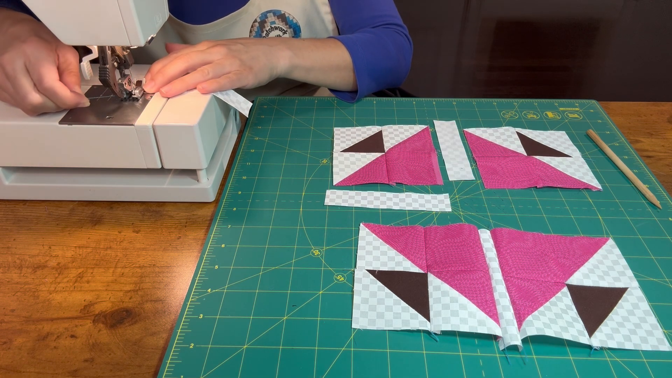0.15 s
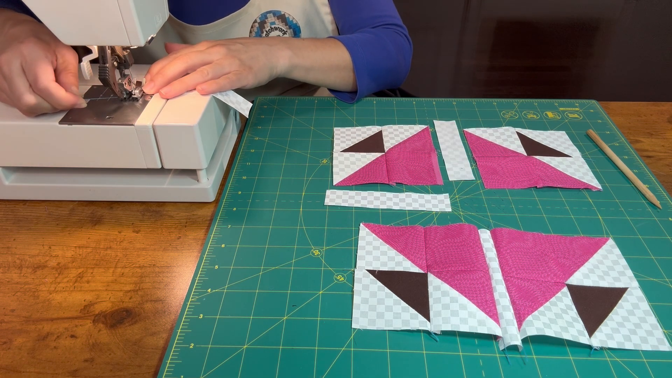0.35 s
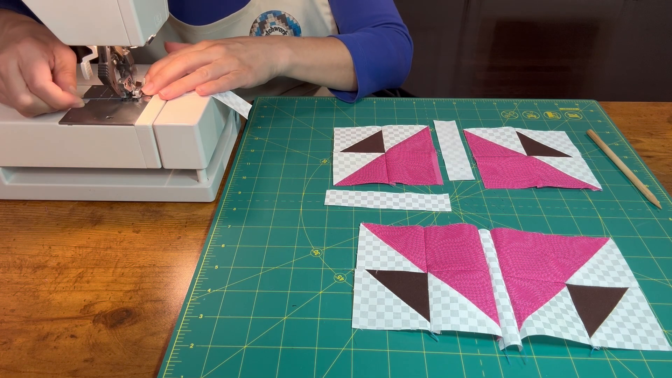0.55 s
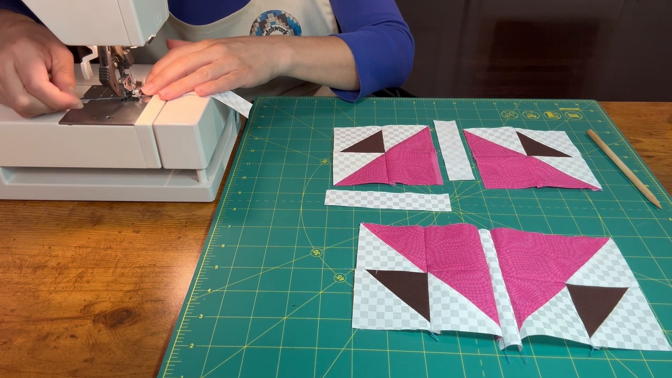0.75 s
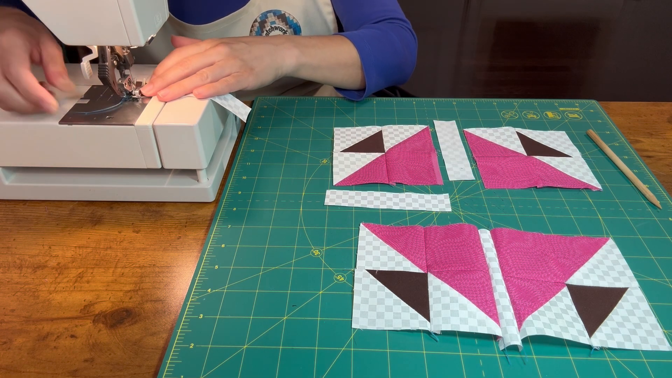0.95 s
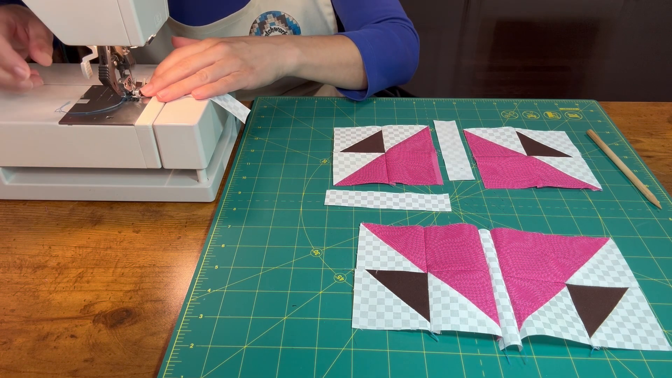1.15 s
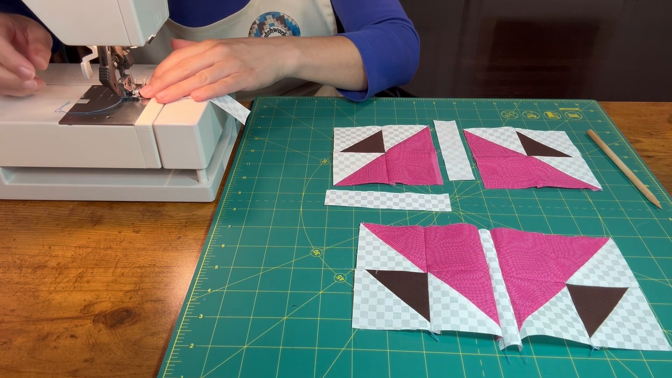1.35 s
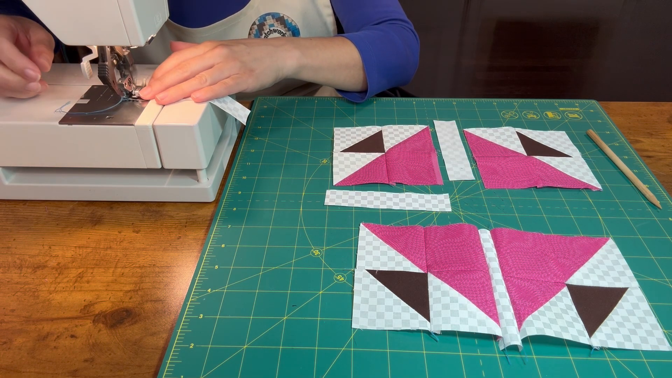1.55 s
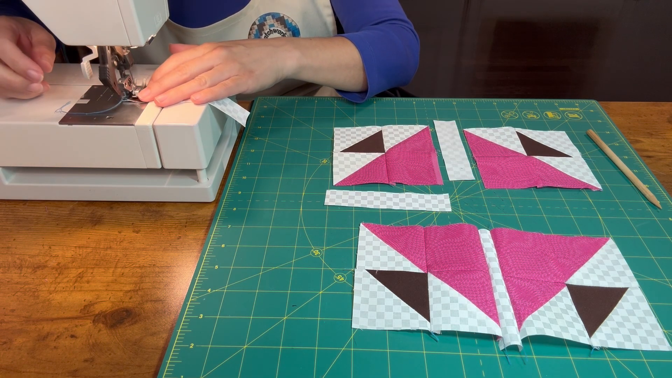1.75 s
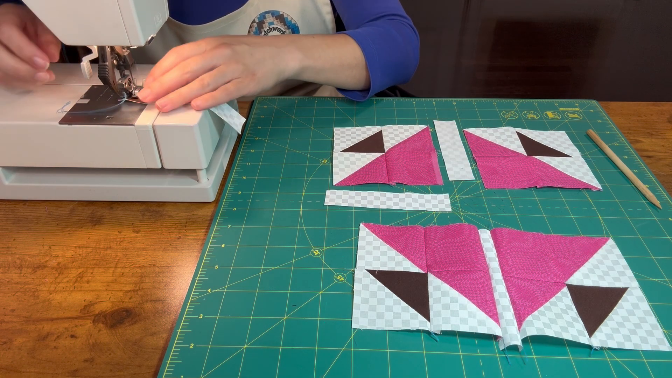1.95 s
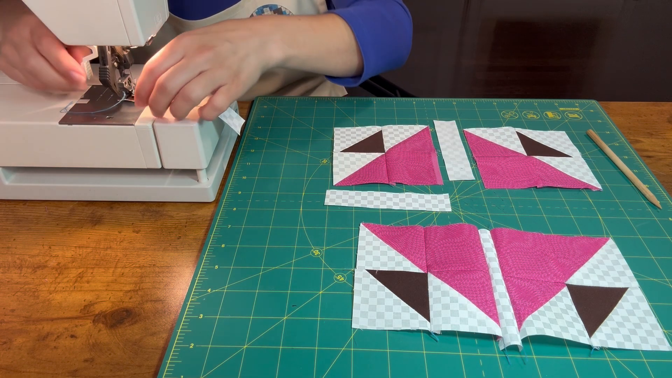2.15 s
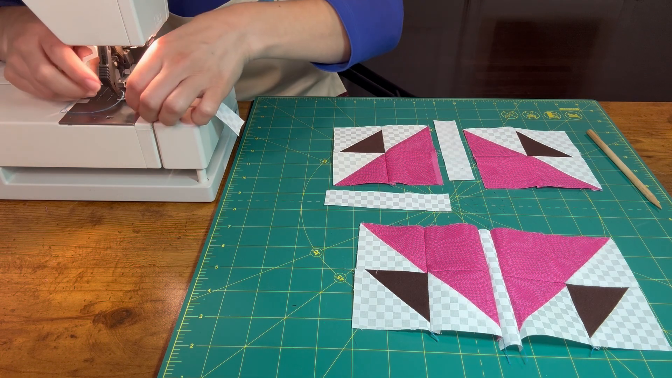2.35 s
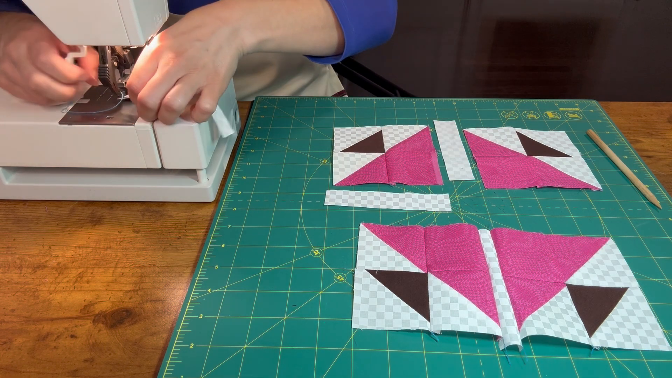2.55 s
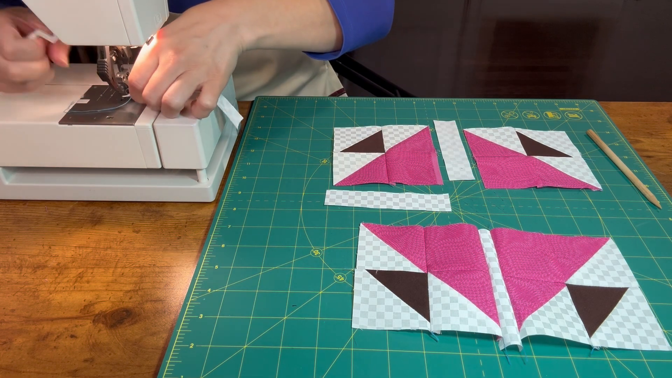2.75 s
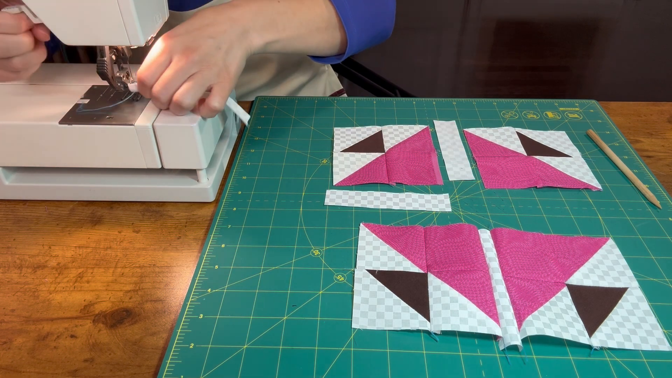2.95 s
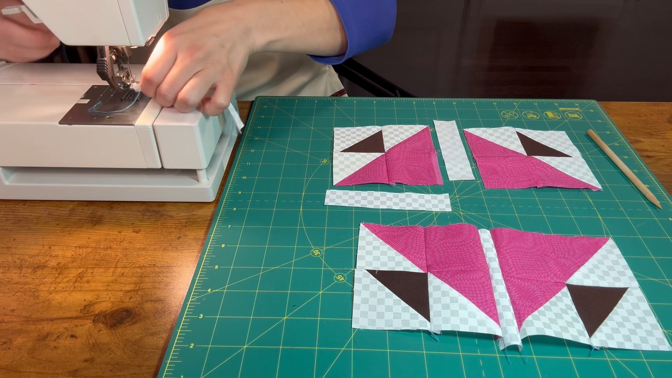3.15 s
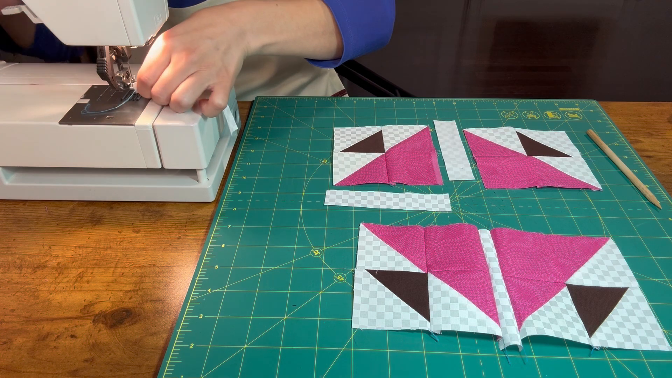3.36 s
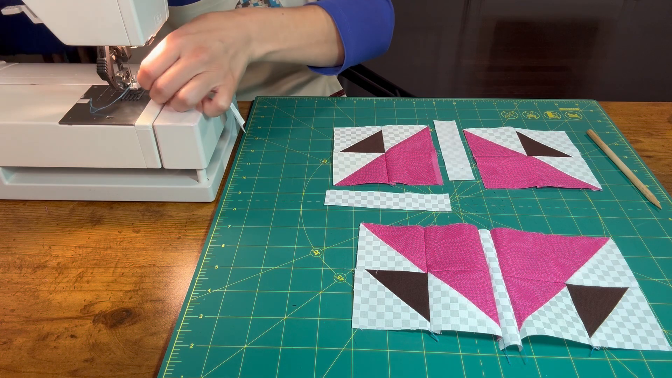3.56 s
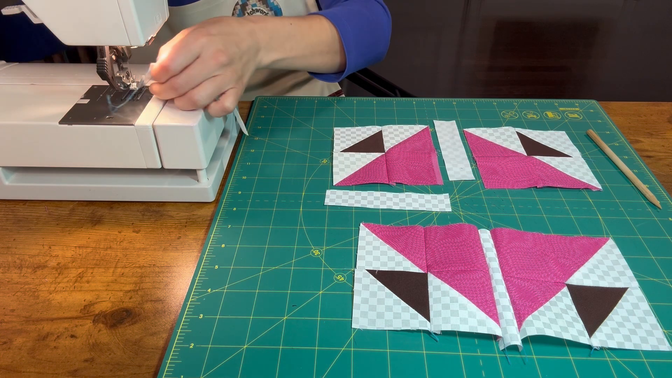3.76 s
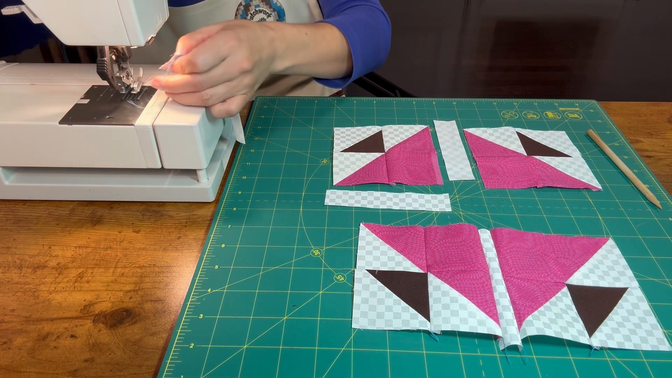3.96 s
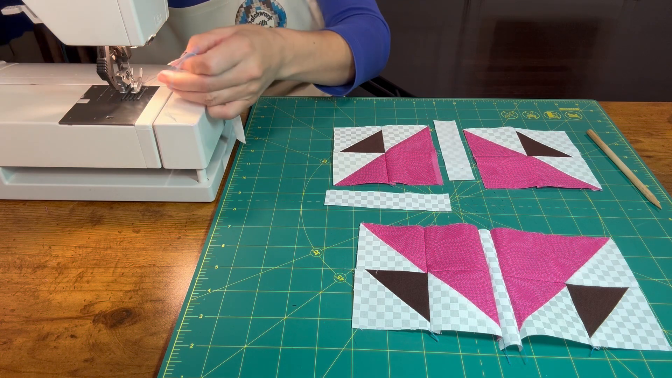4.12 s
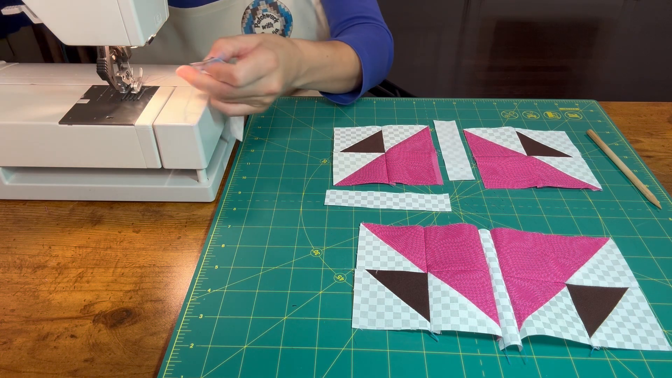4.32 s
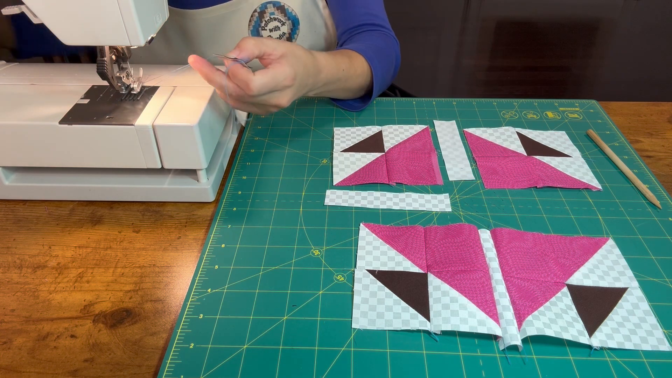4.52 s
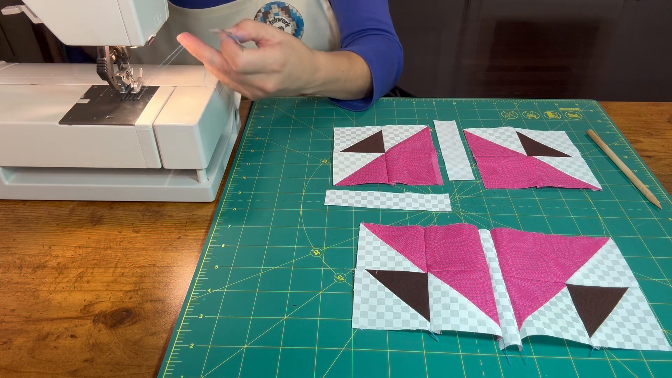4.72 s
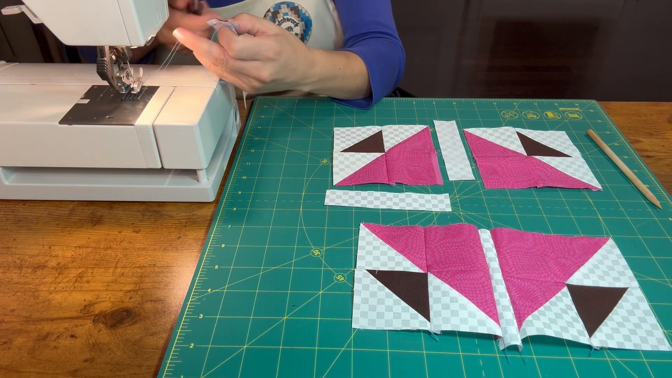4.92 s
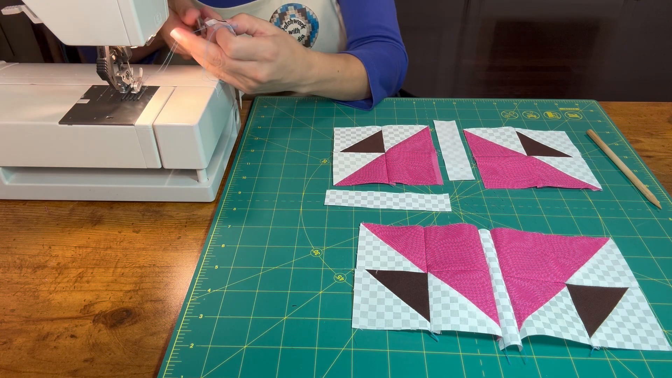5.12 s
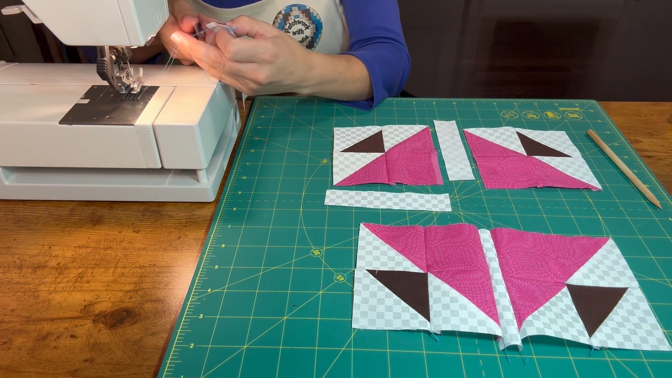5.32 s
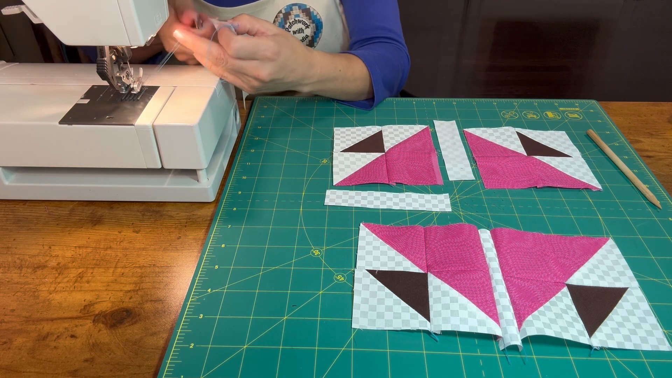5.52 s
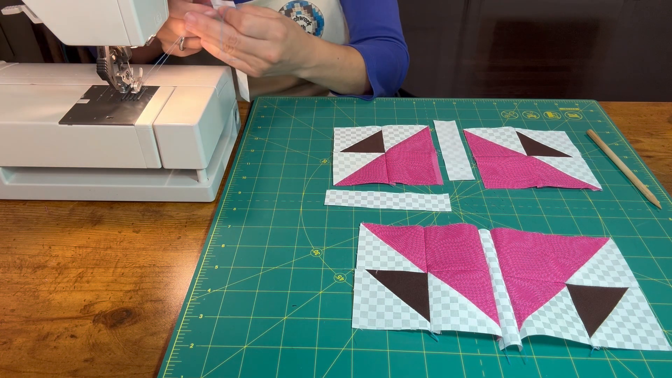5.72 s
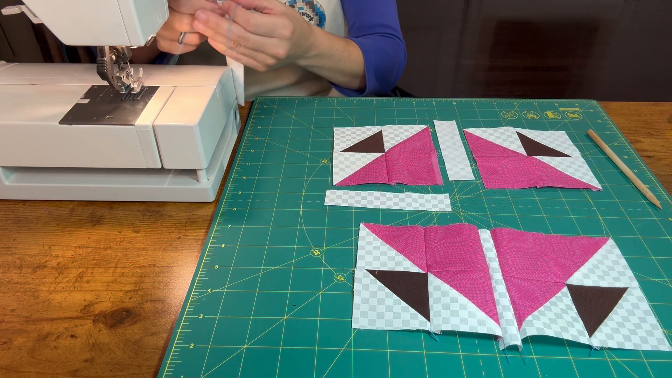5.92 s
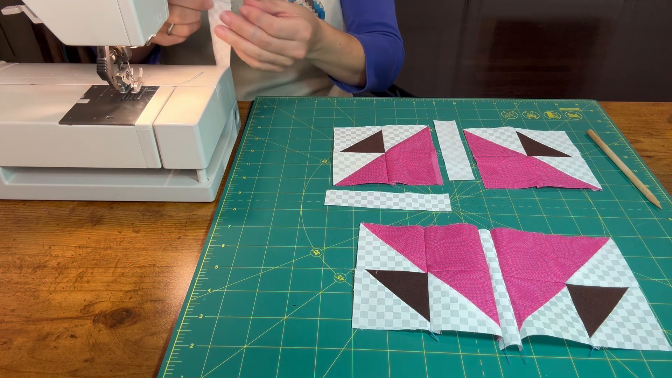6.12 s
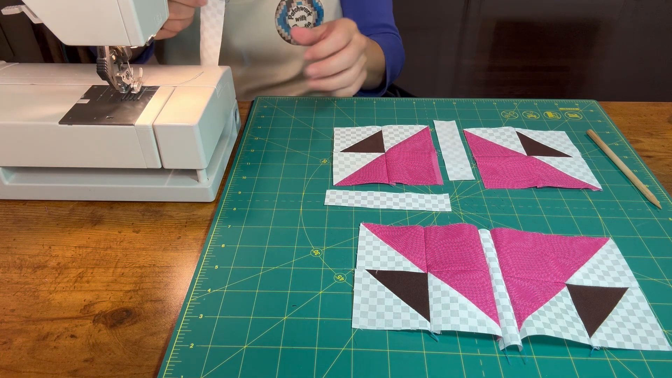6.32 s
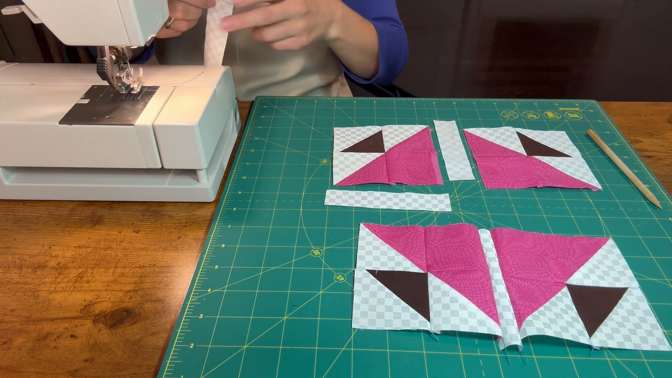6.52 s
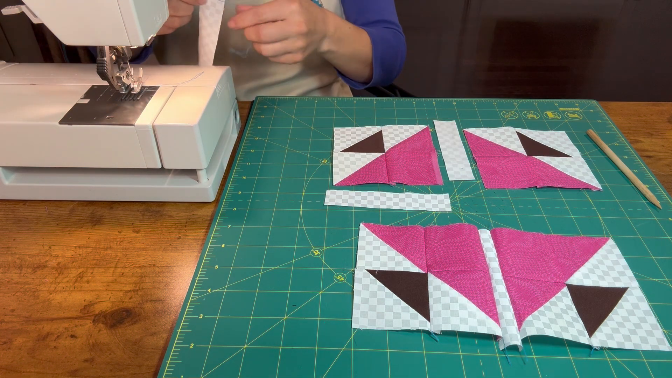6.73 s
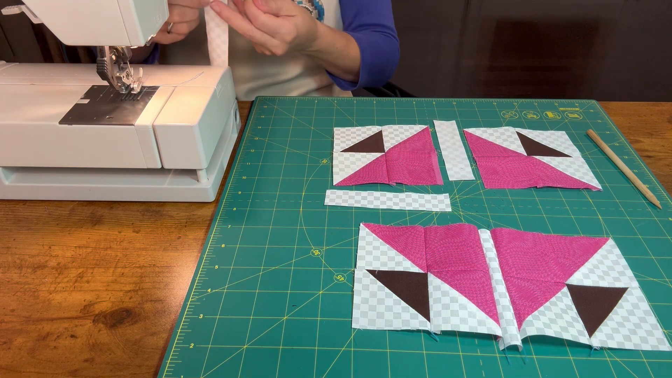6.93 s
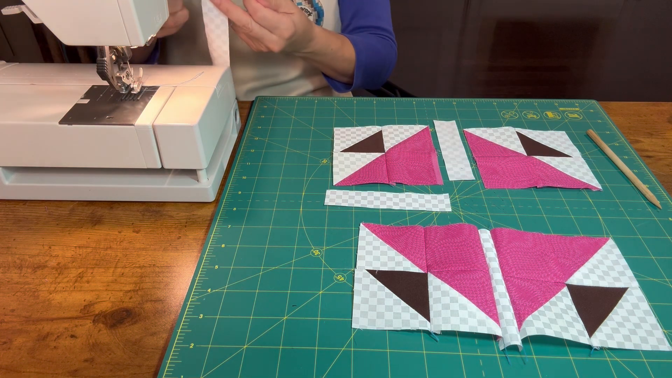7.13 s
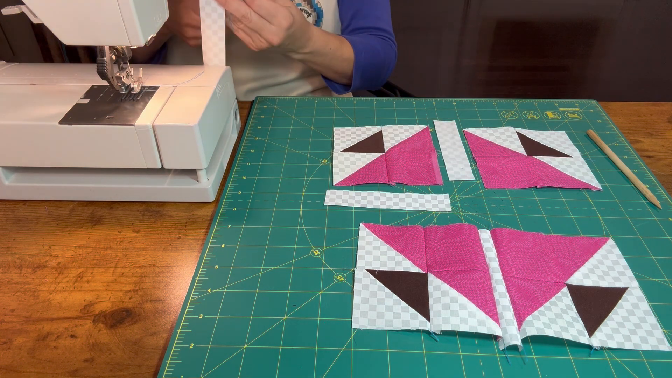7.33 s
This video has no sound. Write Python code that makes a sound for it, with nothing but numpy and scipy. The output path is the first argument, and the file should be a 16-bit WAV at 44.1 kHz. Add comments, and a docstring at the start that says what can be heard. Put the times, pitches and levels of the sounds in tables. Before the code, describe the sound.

A sewing machine on a wooden table is heard closely in stereo in a quiet room with short reflections. From 0 to 0.8 seconds it makes slow, irregular stitches: rattling plastic gears, clunks, bright steel ticks and a low motor note swelling and dying. It nearly pauses around 0.85, catches with separate clacks from about 0.95 to 1.2, including a strong one at 1.14, then runs faster and denser from 1.3 to 2.0. A last slow turn fades by about 2.3. Hands then make crisp clicks and plastic clacks near 2.5-3.0, with a faint tap at 3.3. A harder double knock around 3.95 brings a hollow bed note, a tiny skin judder and soft thread slips until 4.4. Small knocks and a faint steel ping come near 5.4; a sharp, bright scissor snip rings briefly at 5.58. Only low room rumble and faint hum remain, with a barely audible rustle at 6.7.

```python
"""In a quiet room, an electric sewing machine on a wooden table sews a short seam.
It makes slow stitches, a pause, a quick run and a last slow turn. Gears clatter in the plastic housing,
needle bar and hook tick: noise bursts ring resonances. A low note near 114 Hz swells and dies beneath.
Then hands knock at the machine and draw out cloth and thread, heard as clicks, tiny slips and hiss.
Small scissors snip the thread: a short burst of noise sets the blades ringing."""
import sys
import numpy as np
from scipy import signal
from scipy.fft import rfft, irfft, next_fast_len
from scipy.io import wavfile
from scipy.ndimage import uniform_filter1d, map_coordinates

SR = 44100
rng = np.random.default_rng(int(sys.argv[2]) if len(sys.argv) > 2 else 0)


def pcm_store(signal):
    """Save signal as 16-bit PCM."""
    levels = np.round(np.clip(np.atleast_2d(signal), -1, 1) * 32767)
    wavfile.write(sys.argv[1], SR, levels.astype(np.int16).T)


N = 329868
T = np.arange(N) / SR  # time of every sample, seconds

# Event levels are relative: the functions below add a trim to most of them.
# how hard the pedal drives the machine: time_s, drive_db
DRIVE = [(0, -45), (.4, -42.5), (.66, -35), (.79, -44), (.84, -56.5), (1.09, -53), (1.28, -44.5),
         (1.38, -39), (1.45, -31.5), (1.66, -32), (1.74, -28.5), (1.93, -32.5), (1.99, -40.5),
         (2.13, -54.5), (2.28, -51), (2.37, -79)]
# the gear train takes up its play and pulls against the load: start_s, length_s, clatter_db, clunk_db
PULLS = [(0, 0.013, -41, -49), (.056, 0.16, -38, -36.5), (.263, 0.086, -35, -31),
         (0.438, 0.052, -32.5, -41.5), (0.518, 0.019, -35, -28), (0.592, 0.079, -35.5, -49),
         (0.877, 0.0046, -52, -39.5), (0.956, 0.095, -47, -45.5), (1.115, 0.014, -38, -30.5),
         (1.141, 0.052, -32, -28.5), (1.2, 0.037, -37, -40.5), (1.3, 0.0093, -43, -27.5),
         (1.331, .025, -34.5, -22.5), (1.389, 0.052, -31, -28.5), (2.05, 0.0093, -48.5, -29),
         (2.085, 0.017, -47, -46), (2.174, 0.032, -42.5, -51), (2.243, 0.035, -45.5, -57)]
PULL_ATTACK_S, PULL_RELEASE_S = .006, .016
# sharpest ticks of needle bar, hook and feed dog: start_s, level_db, ring_db (3-7 kHz ring against the tick)
TICKS = [(.1852, -26.5, -10.5), (.2926, -27, -16), (.3241, -32, -2.5), (.3643, -29.5, -10),
         (.4518, -23, -7), (.4838, -21, -11.5), (.5245, -27, -3.5), (.5495, -20, -16.5),
         (.595, -24.5, -8.5), (.6248, -18.5, -20), (.6608, -28.5, -5), (.7278, -26, -8), (.7533, -23, -24),
         (.8811, -38, -4.5), (.9756, -20.5, -8), (1.1418, -39, 1.5), (1.1667, -23.5, -4.5),
         (1.1991, -22, -12), (1.257, -26.5, -8.5), (1.3434, -19, -26.5), (1.3648, -22, -9.5),
         (1.4159, -30.5, -2), (1.503, -18.5, -11.5), (1.6053, -20, -20), (1.6227, -22.5, -15.5),
         (1.636, -24.5, -12.5), (1.6896, -22.5, -9.5), (1.7128, -29, -2.5), (1.729, -20.5, -18),
         (1.753, -30.5, -7), (1.7742, -26.5, -11), (1.7925, -27, -4.5), (1.834, -26.5, -7),
         (1.8726, -27, -1.5), (1.894, -27, -3), (1.93, -23, -7), (1.9665, -27.5, -5.5), (2.0509, -26.5, -8),
         (2.1009, -33, -9)]
# loose linkages clack against the housing: start_s, level_db
CLACKS = [(.061, -28), (0.124, -33), (0.1455, -33), (0.21, -34), (0.269, -32.5), (0.3257, -26.5),
          (0.413, -33), (0.4407, -30), (0.4706, -26.5), (0.5235, -29), (0.591, -27), (0.6653, -25),
          (.9762, -30), (1.117, -35.5), (1.1398, -18), (1.3021, -33), (1.333, -27), (1.3423, -24),
          (1.4247, -21), (1.457, -23.5), (1.5074, -23.5), (1.5725, -24.5), (1.689, -26), (1.7319, -25.5),
          (1.8357, -23.5), (1.8722, -26), (2.052, -30), (2.1447, -58)]
# a low note swells and dies: crest_s, level_db, half_length_s
SWELLS = [(0, -35.5, 0.035), (0.217, -31, .055), (0.391, -36, 0.044), (.55, -29, 0.032),
          (0.694, -29.5, 0.041), (.87, -44, .035), (1.023, -31, .07), (1.198, -35, .026), (1.302, -30, .06),
          (1.37, -34.5, .02), (1.442, -25.5, 0.034), (1.548, -32.5, 0.097), (1.749, -31, .035),
          (1.823, -33.5, .021), (1.971, -38.5, 0.079), (2.093, -41, .022), (2.237, -35.5, .1)]
STEADY_DB = -11.5  # middle level of the same note between swells, relative to the drive
# hands and levers knock at the machine: start_s, steel_click_db, plastic_clack_db, bed_knock_db, table_thud_db
KNOCKS = [(2.185, -64, -66, -32, -52), (2.522, -34, -45, -56.5, -62), (2.571, -37, -31.5, -43, -59),
          (2.606, -60, -64, -50, -51.5), (2.651, -66, -52, -61, -57), (2.677, -58, -55, -60, -53),
          (2.72, -54, -53, -63, -56.5), (2.743, -55, -51.5, -68, -69), (2.778, -55, -52, -58.5, -57),
          (2.8742, -37.5, -30.5, -50.5, -54.5), (2.992, -36, -41.5, -51.5, -67),
          (3.292, -58, -49, -49, -62), (3.953, -57, -32.5, -37.5, -49.5), (3.975, -35.5, -44, -44, -48),
          (5.375, -78, -55, -36.5, -50), (5.402, -42, -70, -64, -49.5), (5.454, -81, -61.5, -49, -54.5)]
# thread and cloth drawn through the machine and fingers: start_s, length_s, rub_db, hiss_db
DRAWS = [(2.51, 0.062, -64.5, -84.5), (2.724, 0.036, -62, -77), (2.834, 0.13, -74.5, -85),
         (3.494, 0.55, -79.5, -89), (4.008, 0.12, -69, -85), (4.118, 0.095, -70, -83.5),
         (4.212, 0.14, -73.5, -82), (4.317, 0.065, -61, -72.5), (4.386, 0.044, -72, -80),
         (4.657, .26, -92.5, -75), (5.366, 0.028, -87, -62.5), (6.719, 0.055, -99.5, -77.5)]
DRAW_ATTACK_S, DRAW_RELEASE_S = 0.056, 0.029
# small steel parts ping when brushed: start_s, pitch_hz, level_db
PINGS = [(2.523, 11060, -62), (5.388, 6300, -67), (5.409, 10000, -66)]
PING_T60_S = .19  # time to fall by 60 dB

# Resonances of each part: pitch_hz, width_hz, level_db (relative within the table)
# the plastic housing, and a thin panel of it
HOUSING = [(160, 14, 0), (222, 18, -1), (279, 25, -5), (440, 60, -2), (540, 25, -5), (750, 48, 3.5),
           (915, 50, -2), (1085, 70, -5), (1280, 120, -8.5), (1450, 80, -6), (1700, 260, -10.5),
           (2190, 110, -13)]
PANEL = [(469, 70, -2.5), (740, 47, -0.5), (958, 91, 0), (1090, 220, -3), (1440, 140, -1), (1715, 170, 0.5),
         (2260, 120, -12)]
# steel parts of the needle works, and hard plastic
STEEL = [(3400, 100, -11), (4120, 150, -5), (4700, 210, -1.5), (5860, 440, -18), (6880, 700, -10.5)]
PLASTIC = [(869.6, 170, -8), (1160, 660, -1.5), (1860, 200, 4), (2500, 800, -5.5), (3460, 310, -4.5),
           (4130, 420, -9)]
# the hollow bed of the machine
BED = [(228, 41, 0.5), (348, 110, 1.5), (474, 130, 1.5), (760, 250, -6.5), (1090, 75, -6.5),
       (1350, 100, -14.5)]
# the discs that hold the thread tight
DISCS = [(398.5, 160, -3.5), (680, 110, -1.5), (878, 220, -10), (1193, 70, 2), (1450, 84, -7),
         (1872, 330, -17.5), (2637, 650, -18.5), (3440, 130, -15), (4020, 170, -17.5)]
# the scissor blades
BLADES = [(3400, 320, -16.5), (4080, 640, -13.5), (4730, 500, -17.5), (5455, 250, -20.5),
          (5866, 259, -12.5), (6915, 220, -2.5), (7710, 170, -3.5), (8050, 100, -8), (10990, 150, 5),
          (11550, 90, -5.5), (11890, 130, -2.5), (12250, 200, -0.5), (12900, 200, -5.5), (13750, 290, -3.5)]
# the table's ringing notes: pitch_hz, level_db, t60_s
TABLE = [(117, 6.5, 0.32), (172, -1, 0.3), (220, 1, 0.17)]

# Tone colours: pitch_hz, level_db (per Hz, relative within the table)
# loose rattle and clunks of the gears
CLATTER = [(25, -32), (45, -16.5), (110, -11.5), (220, -5), (320, -11), (440, -2.5), (620, -5), (770, -3),
           (950, -4.5), (1270, -11.5), (1800, -15), (2400, -27), (4000, -35), (6000, -48)]
# sharp steel ticks and clicks
TICK = [(1500, -35.5), (3000, -10), (6000, -10), (8500, -9), (10800, -6.5), (12300, 5.5), (13200, -6.5),
        (14200, 6), (15500, -4.5), (16400, -29)]
# steel parts sliding
SLIDING = [(1470, -40.5), (2500, -3.5), (3700, -5), (4210, 0.5), (4760, -1.5), (5310, -11), (5970, -4),
           (10900, -12), (12100, -3), (14200, -5), (16000, -26)]
# thread and cloth in the fingers
HISS = [(2000, -23.5), (5000, -15), (9000, -14.5), (12700, -2), (14500, -7), (16000, -36.5)]
# thread fibres parting; also colours the hard cracks of the knocks
SHEAR = [(500, -24), (1500, -19.5), (2300, -12), (2900, -8.5), (3800, -1), (7500, -8), (15000, -10)]
# the quiet room
QUIET = [(15, -43.5), (25, -19), (49, -6.5), (80, -13.5), (117, -6.5), (149, -16), (195, -16), (309, -26.5),
         (516, -30), (1520, -42.5), (10000, -55), (12500, -46), (16000, -69)]

# mains hum: pitch_hz, level_db
HUM = [(60, -73.5), (120, -76)]
# how long the room rings: pitch_hz, t60_s
ROOM = [(120, .15), (700, .16), (1500, .24), (3000, .31), (6000, .3), (12000, .26)]
# quick reflections off table and machine: pitch_hz, level_db (relative to the direct sound)
NEAR = [(120, -26), (330, -11), (800, -10), (1300, -7), (2200, -3), (6500, -2), (8400, -25)]
# the microphone pair, left minus right: pitch_hz, difference_db
BALANCE = [(110, -1.5), (400, -3.5), (750, 3), (1250, 4.5), (1900, 0), (2500, -2), (4400, -4.5),
           (6000, -0.5), (7000, 1), (8500, 0.5)]
# the microphone pair, how far left leads: pitch_hz, lead_radians
LEAD = [(100, 0), (300, .2), (600, 1.3), (1200, .7), (2000, 1.5), (2700, 1.5), (4000, 0), (5000, -1.2),
        (6800, -1.5), (9000, 0), (10300, 0), (13000, 1.5), (16000, 3.1)]
MONO_HZ, TOP_HZ = 8400, 16450  # the pair shares one signal above MONO_HZ; nothing is left above TOP_HZ

# lighter ticks and sliding steel follow the drive; their levels, before trims, hold at full drive
FULL_DB = -30
LIGHT_PER_S = 40  # roughly, as the gaps are uneven
LIGHT_DB, LIGHT_SPREAD_DB, LIGHT_RING_DB = -27, 1.5, -11
LIGHT_GROWS = 0.93  # dB of tick per dB of drive
LIGHT_END_S = 2.11  # the last turn is too slow to make them
SLIDE_DB, SLIDE_GROWS = -45.5, 1.2
# the motor's narrow note sinks a little under load
WHIRR_DB, WHIRR_GROWS = -39.5, .7
WHIRR_HZ, WHIRR_SAG_HZ_PER_DB, WHIRR_WIDTH_HZ = 744, 3.2, 60
# a finger judders as it slides off the bed, slowing as it goes
JUDDER_S, JUDDER_LENGTH_S, JUDDER_DB = 4.01, 0.044, -52
JUDDER_HZ, JUDDER_SAG_HZ_PER_S = 263, 900
# the scissors: faint noise swells just before the snip, which shears the thread (levels before trims)
LEAD_IN_S, LEAD_IN_DB = 0.035, -47
SNIP_S, SNIP_LENGTH_S, SNIP_DB = 5.5837, 0.003, -14.5
SNIP_ATTACK_S, SNIP_RELEASE_S = .0011, 0.00071

FFT_SIZE = next_fast_len(N + SR // 2, True)
HZ = np.fft.rfftfreq(FFT_SIZE, 1 / SR)  # the pitch of every step of a filter


def amp(db):
    """Turn decibels into a gain."""
    return 10 ** (np.asarray(db) / 20)


def unit(x):
    """Scale a sound to an average (rms) level of 1."""
    return x / np.sqrt(np.mean(x ** 2) + 1e-20)


def along(points, hz):
    """Read a curve of (pitch_hz, value) points, evenly spaced by musical interval."""
    f, value = np.transpose(points)
    return np.interp(np.log(hz + 1), np.log(f + 1), value)


def levels(rows):
    """Make one gain per sample from (time_s, level_db) rows; silent after the last."""
    s, db = np.transpose(rows)
    return amp(np.interp(T, s, db, right=-140))


def wobble(rate):
    """Draw a smooth random curve with this many random points a second."""
    return map_coordinates(rng.standard_normal(int(N * rate / SR) + 4), [T * rate])


def noise():
    """Make white noise with an average (rms) level of 1."""
    return rng.standard_normal(N)


def filtered(x, response):
    """Pass a sound through a filter given pitch by pitch."""
    return irfft(rfft(x, FFT_SIZE) * response, FFT_SIZE)[..., :N]


def colour(points):
    """Make a filter of unit power with the given tone colour, which never sounds before its input."""
    cepstrum = irfft(np.log(amp(along(points, HZ)) + 1e-6), FFT_SIZE)
    # folding the second half onto the first keeps the answer after the input
    cepstrum[1:FFT_SIZE // 2] *= 2
    cepstrum[FFT_SIZE // 2 + 1:] = 0
    response = np.exp(rfft(cepstrum))
    return response / np.sqrt(np.mean(abs(response) ** 2))


def body(modes):
    """Add up resonances, with alternating signs, into one filter of unit power."""
    response = 0
    for k, (hz, width, db) in enumerate(modes):
        damping = 1j * HZ * width
        response = response + (-1) ** k * amp(db) * damping / (hz * hz - HZ * HZ + damping)
    return response / np.sqrt(np.mean(abs(response) ** 2))


def bending(lag):
    """Bending waves spread out: low notes arrive later; lag is the delay in seconds at 1 kHz."""
    return np.exp(-4j * np.pi * lag * np.sqrt(1000 * HZ))


def contacts(times, dbs, t60, rise):
    """Make brief bursts of chatter where two hard parts meet; t60 and rise are in seconds."""
    out, t = np.zeros(N + SR), np.arange(SR // 10) / SR
    fade = amp(-60 * t / t60) * (1 - np.exp(-(t / rise) ** 2))
    for s, db in zip(times, dbs):
        burst = rng.standard_normal(len(t)) * fade
        even = np.linalg.norm(fade) / np.linalg.norm(burst)  # same energy for every draw
        out[max(round(s * SR), 0):][:len(t)] += amp(db) * burst * even
    return out[:N]


def rattle(rate, spread_db):
    """Scatter random tiny impacts of unequal size, about this many a second, at rms 1."""
    hits = rng.random(N) < rate / SR
    return unit(hits * np.sign(noise()) * amp(spread_db * noise()))


def gesture(start, length, attack, release):
    """Shape a level that rises, holds and dies away; all times in seconds."""
    rise = np.clip((T - start) / attack, 0, 1)
    return rise * np.exp(-np.clip((T - start - length) / release, 0, 20))


def effort():
    """Add the pulls against the load to the pedal's drive, as power."""
    pulls = sum((amp(db) * gesture(s, length, PULL_ATTACK_S, PULL_RELEASE_S)) ** 2
                for s, length, db, _ in PULLS)
    return np.sqrt(levels(DRIVE) ** 2 + pulls)


def gears(drive, top_rate=186, spread_db=3, teeth_db=-6.0, clunk_db=-6, uneven_db=0.56, loose_grows=0.056):
    """Meshing teeth strike the housing, faster as the machine runs harder; loose parts rattle and clunk."""
    speed = np.abs(uniform_filter1d(drive, SR // 4))
    rate = top_rate * (speed / speed.max()) ** .3  # tooth strikes a second
    turns = np.cumsum(rate) / SR + .14 * wobble(90)
    strikes = np.diff(np.floor(np.maximum.accumulate(turns)), prepend=0)  # one per whole count
    teeth = strikes * amp(spread_db * noise())
    teeth /= np.sqrt(np.mean(teeth[:2 * SR] ** 2))
    force = drive * amp(uneven_db * wobble(45))
    mesh = filtered(amp(teeth_db) * force * teeth, body(HOUSING) / (1 + (HZ / 2300) ** 4))
    s, _, _, db = np.transpose(PULLS)
    clunks = contacts(s, db + clunk_db, t60=0.11, rise=0.00029)
    bunches = unit(rattle(750, spread_db=2.6) * amp(1.8 * wobble(130)))
    looseness = force * (drive / amp(FULL_DB)) ** loose_grows
    loose = filtered(looseness * bunches + clunks, colour(CLATTER))
    return mesh + loose + amp(-16.5) * filtered(clunks, body(PLASTIC))


def light_ticks(drive):
    """Small ticks at uneven gaps, louder as the machine runs harder: rows of start_s, level_db, ring_db."""
    gap, size, ring = rng.standard_normal((300, 3)).T
    s = np.cumsum(np.exp(0.32 * gap)) / LIGHT_PER_S
    drive_db = 20 * np.log10(np.interp(s, T, drive)) - FULL_DB
    tick_db = LIGHT_DB + LIGHT_GROWS * drive_db + LIGHT_SPREAD_DB * size
    rows = np.column_stack([s, tick_db, LIGHT_RING_DB + 3 * ring])
    return rows[(s < LIGHT_END_S) & (drive_db > -13)]


def needle(drive, tick_db=-6, ring_db=-6.5, clack_db=-8):
    """Needle bar, hook and feed dog tick, ring and clack in their bearings, over a chatter of sliding steel."""
    s, db, ring_share_db = np.vstack([TICKS, light_ticks(drive)]).T
    ticks = filtered(contacts(s, db + tick_db, t60=.019, rise=.0008), colour(TICK))
    rings = filtered(contacts(s, db + ring_share_db + ring_db, t60=0.027, rise=.001), body(STEEL))
    clacks = filtered(contacts(s, db + ring_share_db + clack_db, t60=0.013, rise=0.0009), body(PLASTIC))
    slide = amp(SLIDE_DB) * (levels(DRIVE) / amp(FULL_DB)) ** SLIDE_GROWS
    chatter = unit(noise() * amp(5 * wobble(280)))
    return ticks + rings + clacks + filtered(slide * chatter, colour(SLIDING))


def linkage(trim_db=-1.0):
    """Single hard clacks of loose linkages ring a panel of the housing."""
    s, db = np.transpose(CLACKS)
    hits = contacts(s, db + trim_db, t60=0.02, rise=.0008)
    return filtered(hits, body(PANEL) / (1 + (HZ / 3200) ** 4))


def whirr(drive, flutter_db=3.5):
    """The motor's narrow, broken note fades out as the machine comes to rest."""
    load_db = 20 * np.log10(np.abs(uniform_filter1d(drive, SR // 20)) + 1e-6) - FULL_DB
    hz = WHIRR_HZ - WHIRR_SAG_HZ_PER_DB * load_db
    band = wobble(WHIRR_WIDTH_HZ) + 1j * wobble(WHIRR_WIDTH_HZ)  # slow noise that widens the note
    note = np.real(band * np.exp(2j * np.pi * np.cumsum(hz) / SR))
    running = np.minimum(drive / amp(-47), 1) ** 2
    level = amp(WHIRR_DB) * running * (drive / amp(FULL_DB)) ** WHIRR_GROWS
    return level * unit(note * amp(flutter_db * wobble(25)))


def bed_rumble(drive, rumble_db=-45, grows=.5):
    """The turning shaft makes the hollow bed rumble, even at a slow turn: noise through its resonances."""
    running = np.minimum(drive / amp(-58), 1)
    return filtered(amp(rumble_db) * running * (drive / amp(FULL_DB)) ** grows * noise(), body(BED))


def low_note(hz=114, wander=0.71, steep=1.8, fade=2.6):
    """A low, slightly wandering note near 114 Hz swells and dies, over a steadier share that follows the drive."""
    swells = sum(amp(db) ** 2 * np.exp(-fade * abs((T - s) / half) ** steep) for s, db, half in SWELLS)
    steady = amp(STEADY_DB + 3.8 * wobble(25)) * levels(DRIVE)
    level = np.sqrt(swells + steady ** 2)
    return np.sqrt(2) * level * np.sin(2 * np.pi * hz * T + wander * wobble(16))


def handling(click_db=-4, clack_db=-5, knock_db=-5, thud_db=-1, crack_db=-5):
    """Each knock is a steel click, a plastic clack with a hard crack, a hollow bed note and a table thud."""
    s, click, clack, knock, thud = np.transpose(KNOCKS)
    clicks = filtered(contacts(s, click + click_db, t60=0.017, rise=0.0014), colour(TICK))
    clacks = filtered(contacts(s, clack + clack_db, t60=0.023, rise=0.0013), body(PLASTIC))
    crack_colour = colour(SHEAR) / (1 + 1j * HZ / 4000)
    cracks = filtered(contacts(s, clack + crack_db, t60=0.0048, rise=0.0011), crack_colour)
    bed_filter = body(BED) * bending(lag=0.00074)
    knocks = filtered(contacts(s, knock + knock_db, t60=0.11, rise=0.0012), bed_filter)
    thuds, t = np.zeros(N + SR), np.arange(SR // 2) / SR
    for start, db in zip(s, thud + thud_db):
        ring = np.zeros(len(t))
        for hz, level, t60 in TABLE:
            uneven = rng.normal(0, 1)  # dB, so no two thuds match
            ring += amp(db + level + uneven - 60 * t / t60) * np.sin(2 * np.pi * hz * t)
        thuds[round(start * SR):][:len(t)] += ring * (1 - np.exp(-t / 0.0047))
    return clicks + clacks + cracks + knocks + thuds[:N]


def thread():
    """Thread slips through the tension discs in tiny impacts, and hisses through the fingers with the cloth."""
    shapes = np.array([gesture(s, length, DRAW_ATTACK_S, DRAW_RELEASE_S) for s, length, _, _ in DRAWS])
    rub, hiss = amp(np.array(DRAWS)[:, 2:]).T @ shapes
    slips = filtered(rub * rattle(2000, spread_db=2), body(DISCS))
    return (slips + hiss * filtered(noise(), colour(HISS))) * amp(2.3 * wobble(40))


def finger(rough=1.35, overtone_db=-18):
    """Skin sticks and slips on the plastic bed: a short falling groan with one overtone."""
    rate = JUDDER_HZ - JUDDER_SAG_HZ_PER_S * np.clip(T - JUDDER_S, 0, .11)
    phase = 2 * np.pi * np.cumsum(rate) / SR + rough * wobble(65)
    groan = np.sin(phase) + amp(overtone_db) * np.sin(2 * phase)
    return amp(JUDDER_DB) * gesture(JUDDER_S, JUDDER_LENGTH_S, 0.0098, 0.05) * groan


def pings():
    """Small steel parts brushed by the fingers ping: thin, high notes that die away."""
    out = np.zeros(N)
    for s, hz, db in PINGS:
        t = np.maximum(T - s, 0)
        out += amp(db - 60 * t / PING_T60_S) * np.sin(2 * np.pi * hz * t)
    return out


def scissors(ring_db=-1, shear_db=-16.0):
    """Faint noise swells, then the snip crunches through the thread and sets the small blades ringing."""
    lead_in = gesture(SNIP_S - LEAD_IN_S, LEAD_IN_S, LEAD_IN_S, SNIP_RELEASE_S) ** 2
    snip = gesture(SNIP_S, SNIP_LENGTH_S, SNIP_ATTACK_S, SNIP_RELEASE_S)
    force = amp(LEAD_IN_DB) * lead_in + amp(SNIP_DB) * snip
    crunch = force * noise()
    power = np.abs(uniform_filter1d(abs(rfft(crunch, FFT_SIZE)) ** 2, size=3000))
    crunch = filtered(crunch, np.sqrt(power.mean() / power))  # the crunch feeds all pitches evenly
    ring = body(BLADES) * HZ ** 2 / (HZ ** 2 + 2800 ** 2)
    return filtered(crunch, amp(ring_db) * ring) + amp(shear_db) * filtered(force * noise(), colour(SHEAR))


def room(x, wet_db, count=12):
    """Direct sound, quick reflections opposite in the two microphones, and a tail redrawn for each stretch."""
    # every pitch band is reflected with its own random delay, in seconds
    delay = .003 * np.exp(.5 * map_coordinates(rng.standard_normal(SR // 600 + 4), [HZ / 300]))
    near = filtered(x, amp(along(NEAR, HZ)) * np.exp(-2j * np.pi * np.cumsum(delay) * HZ[1]))
    tails = np.zeros((2, N + SR))
    for part in np.array_split(np.arange(N), count):
        # the tail is noise in which every pitch dies at its own pace
        hz, t, z = signal.stft(rng.standard_normal((2, SR // 3)), SR, nperseg=256)
        tail = signal.istft(z * amp(-60 * t / along(ROOM, hz)[:, None]), SR, nperseg=256)[1]
        tail *= 1 - np.exp(-np.arange(tail.shape[1]) / SR / .005)
        answer = signal.fftconvolve(x[part][None], tail / np.linalg.norm(tail[0]), axes=1)
        tails[:, part[0]:part[0] + answer.shape[1]] += answer
    return np.array([x + near, x - near]) + amp(wet_db) * tails[:, :N]


def background(level_db=-69, side_db=-9):
    """Low room rumble made of noise, with a faint mains hum."""
    hum = sum(np.sqrt(2) * amp(db) * np.sin(2 * np.pi * hz * T + 0.36 * wobble(1.0)) for hz, db in HUM)
    mid = filtered(noise(), colour(QUIET))
    side_gain = amp(along([(100, side_db), (500, 0.0067)], HZ))  # the lowest rumble is less wide
    side = filtered(noise(), colour(QUIET) * side_gain)
    return hum + amp(level_db) * np.array([mid + side, mid - side])


def scene():
    """Machine, hands and scissors in the room; some machine sound reaches the two microphones with opposite sign."""
    drive = effort()
    apart = filtered(amp(-11) * (gears(drive) + needle(drive)), HZ / (HZ + 250))
    ends = np.array([apart, -apart])  # parts at the far ends of the machine
    housing = gears(drive) + linkage() + whirr(drive) + bed_rumble(drive)
    machine = room(housing, wet_db=-9.5) + room(needle(drive), wet_db=-12.0) + ends + low_note()
    hands = room(handling() + thread() + finger() + pings(), wet_db=-7.5) + room(scissors(), wet_db=-7.5)
    return machine + hands + background()


def record(dry):
    """Two close microphones that share one signal in the top treble, and the upper pitch limit."""
    left, right = dry
    shared = np.clip((HZ - MONO_HZ) / 1000 + .5, 0, 1) * np.pi / 2  # right turns into left
    right = filtered(right, np.cos(shared)) + filtered(left, np.sin(shared))
    half = amp(along(BALANCE, HZ) / 2) * np.exp(.5j * along(LEAD, HZ))  # each side takes half the difference
    limit = np.clip((TOP_HZ - HZ) / 200 + .5, 0, 1)
    return filtered(np.array([left, right]), np.array([half, 1 / half]) * limit)


dry = scene()
out = record(dry)
pcm_store(out)
```